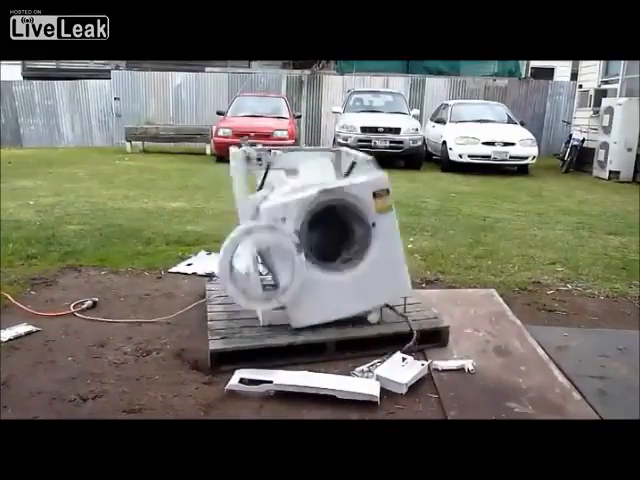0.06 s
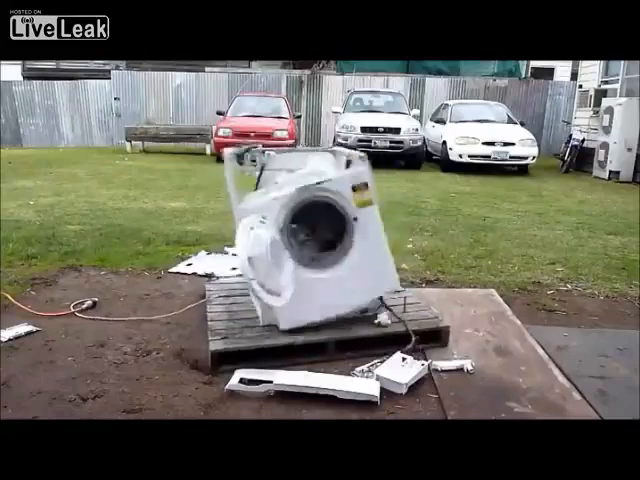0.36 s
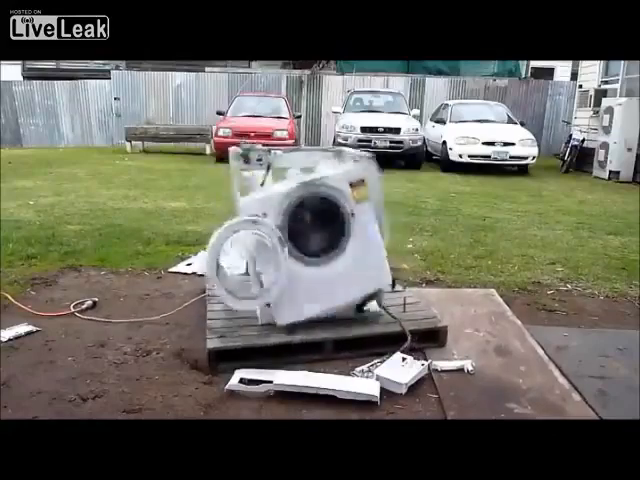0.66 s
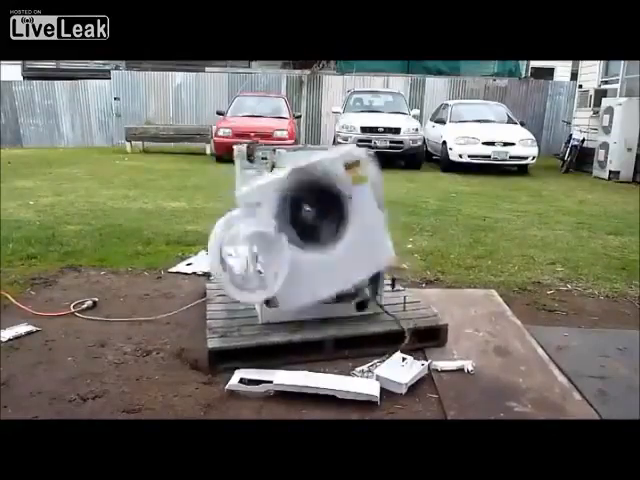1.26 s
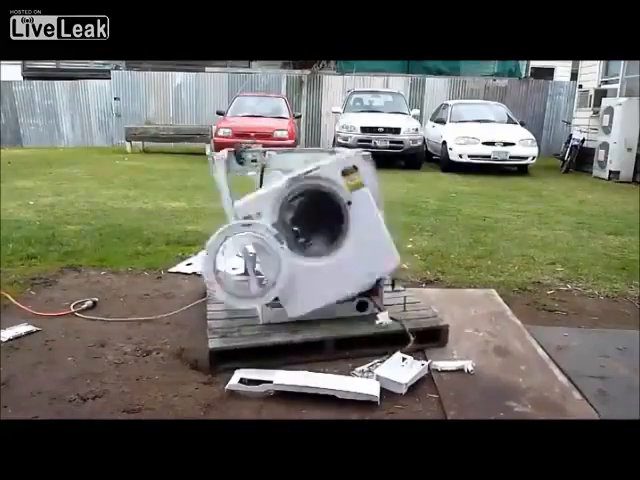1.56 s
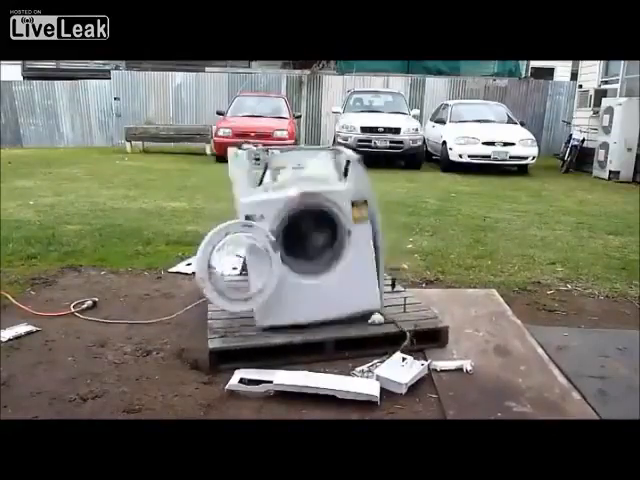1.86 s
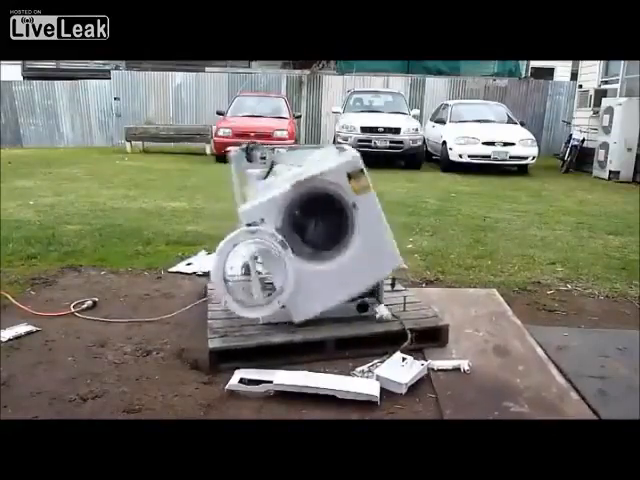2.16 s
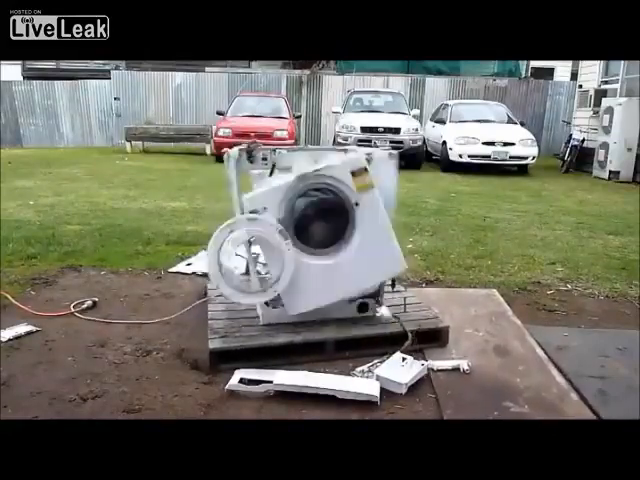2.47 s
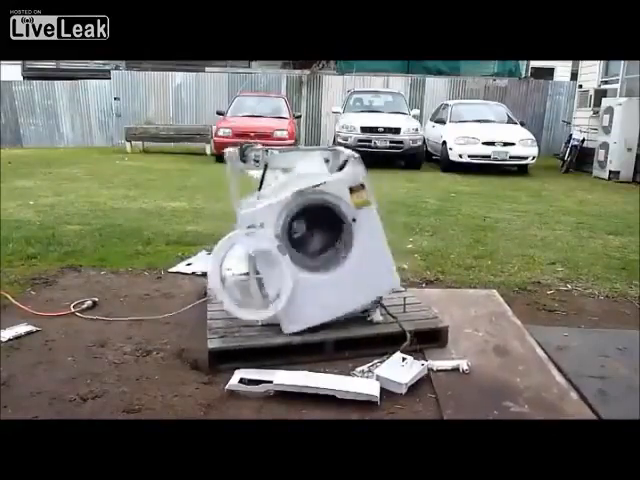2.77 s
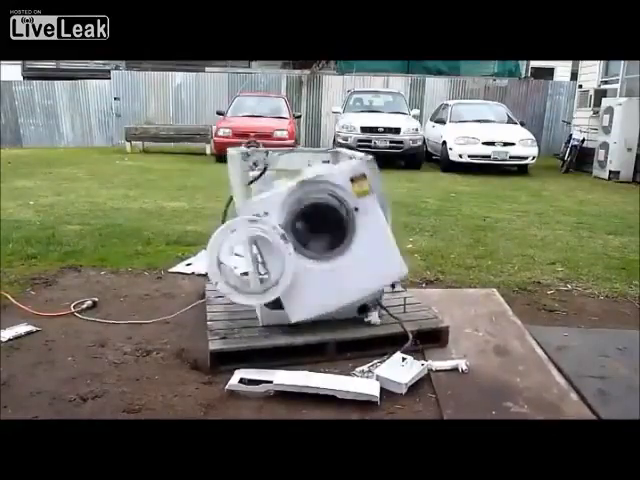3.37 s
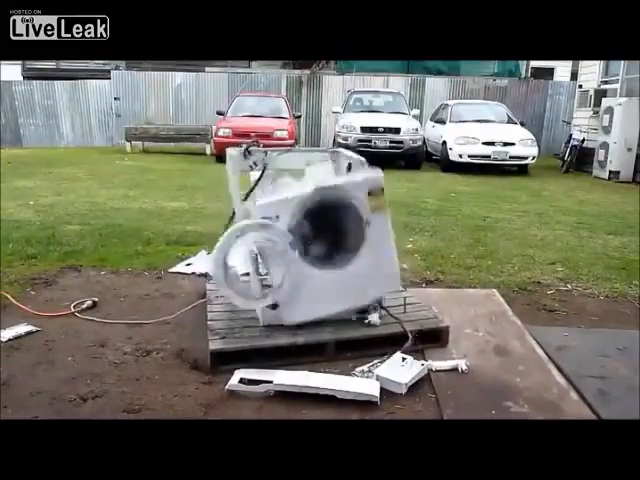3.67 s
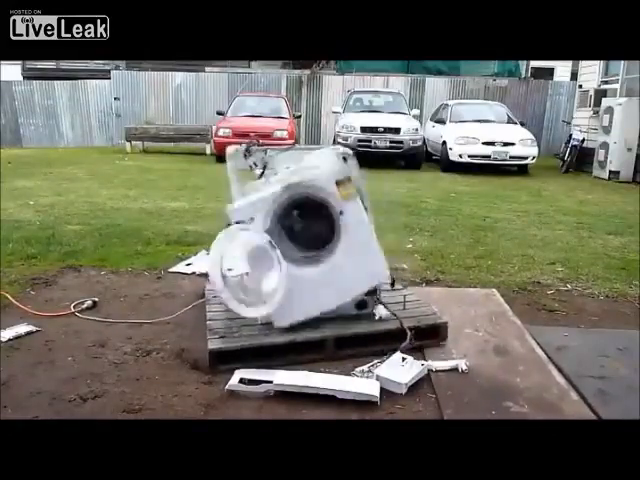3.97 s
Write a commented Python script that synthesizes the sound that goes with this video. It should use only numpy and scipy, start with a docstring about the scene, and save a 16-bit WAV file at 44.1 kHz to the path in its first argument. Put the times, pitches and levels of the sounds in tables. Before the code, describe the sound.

A broken washing machine bangs and clatters without pause in a fenced yard, a few metres from the microphone. Rapid, uneven sheet metal booms mix with bright rattling, scraping, hollow knocks and dull thuds on wooden boards.

```python
"""Sheet steel bangs and clatters: a wrecked washing machine spins off balance on a wooden pallet,
in a yard, some metres in front of the microphone. The tub slams into the cabinet several times
a turn and bottoms out on its springs with hollow knocks. Loose parts rattle and clash, the frame
thuds on the pallet, and the fence throws a little of the din back."""
import sys
import numpy as np
from scipy import signal
from scipy.fft import rfft, irfft
from scipy.io import wavfile

SR = 44100
rng = np.random.default_rng(int(sys.argv[2]) if len(sys.argv) > 2 else 0)


def unload_audio(sound):
    """Save the sound as a 16-bit wav file, at the path given as the first command line argument."""
    columns = np.transpose(np.atleast_2d(sound))
    # keep every value between -1 and 1, then stretch to whole-number steps
    steps = np.round(np.clip(columns, -1, 1) * 32767)
    wavfile.write(sys.argv[1], SR, steps.astype(np.int16))


N = 176400
TIME = np.arange(N) / SR


def amp(db):
    """Decibels to gain."""
    return 10 ** (np.asarray(db) / 20)


def curve_at(points, hz):
    """Interpolates a table on a log-frequency axis."""
    points_hz, values = np.transpose(points)
    return np.interp(np.log(hz + 1), np.log(points_hz + 1), values)


def through(x, response):
    """Convolves and keeps the scene's length."""
    return signal.fftconvolve(x, response)[:N]


def body(colour, modes=(), size=8192):
    """Minimum-phase response of unit energy: a broad colour with resonances on top."""
    hz = abs(np.fft.fftfreq(size, 1 / SR))
    peaks_db = sum(top / (1 + (2 * (hz - centre) / width) ** 2) for centre, width, top in modes)
    log_gain = np.log(amp(curve_at(colour, hz) + peaks_db))
    spectrum = np.exp(np.conj(signal.hilbert(log_gain)))
    response = np.fft.ifft(spectrum).real[:size // 2]
    return response / np.linalg.norm(response)


def ring(t60s, size=16384):
    """A dense tail of unit energy, each band dying in the time given for it."""
    hz, t, bands = signal.stft(rng.standard_normal(size), SR, nperseg=256)
    decay = np.exp(-np.log(1000) * t / curve_at(t60s, hz)[:, None])
    tail = signal.istft(bands * decay, SR)[1]
    return tail / np.linalg.norm(tail)


def contacts(per_s, spread_db):
    """Tiny random knocks of uneven size, rms 1."""
    sizes = amp(spread_db * np.minimum(rng.exponential(1, N), 4))
    knocks = sizes * rng.choice([-1, 1], N) * (rng.random(N) < per_s / SR)
    return knocks / np.sqrt(np.mean(knocks ** 2) + 1e-20)


def blow_power(rows, rise_s, hold_s):
    """Summed power of blows (start_s, level_db, fall_s) that rise, hold and die away."""
    power = np.zeros(N)
    for start_s, level_db, fall_s in rows:
        at = round(start_s * SR)
        t = TIME[:min(SR // 2, N - at)]
        envelope = np.minimum(t / rise_s, 1) * np.exp(-np.maximum(t - hold_s, 0) / fall_s)
        power[at:at + len(t)] += (amp(level_db) * envelope) ** 2
    return power


def struck(notes, rise_s, fall_s):
    """One mode swings up and rings out at each blow (start_s, level_db, pitch_hz)."""
    out = np.zeros(N)
    for start_s, level_db, pitch_hz in notes:
        at = round(start_s * SR)
        t = TIME[:min(SR // 4, N - at)]
        envelope = np.minimum(t / rise_s, 1) * np.exp(-np.maximum(t - rise_s, 0) / fall_s)
        tone = np.sin(2 * np.pi * (pitch_hz * t + rng.random()))
        out[at:at + len(t)] += amp(level_db) * envelope * tone
    return out


def jolts(per_s=45, fall_s=0.0052, share=0.39):
    """Random small jolts bunch a rattle into clacks: a power factor of mean 1."""
    kicks = rng.uniform(0.46, 1, N) * (rng.random(N) < per_s / SR)
    power = signal.lfilter([1], [1, -np.exp(-1 / (fall_s * SR))], kicks)
    return 1 - share + share * power / power.mean()


def loose_parts(power, colour, per_s, spread_db, count=4, ring_db=-4.5, t60_s=0.022):
    """Several metal parts chatter, each jolted on its own and with a short ring of its own."""
    out = np.zeros(N)
    for _ in range(count):
        knocks = np.sqrt(power * jolts()) * contacts(per_s / count, spread_db)
        out += knocks + amp(ring_db) * through(knocks, ring([(1, t60_s)]))
    return through(out, body(colour)) / np.sqrt(count * (1 + amp(ring_db) ** 2))


# How long the fenced yard rings: frequency_hz, t60_s
YARD_DECAY = [(500,0.2),(10000,0.5)]
def fence_reflections(direct):
    """The fence returns a faint, short tail to the microphone, longest in the treble."""
    return amp(-19.5) * through(direct, ring(YARD_DECAY))


# What reaches the microphone from the sides: frequency_hz, gain_db
SIDE_COLOUR = [(30,-12),(70,-25),(180,-25),(350,-25),(700,-17),(1400,-11.5),(2800,-8),(5600,-6.5),(9500,-4.5)]
def yard_scatter(din):
    """Sound scattered around the yard arrives from the sides and widens the treble."""
    gain = amp(curve_at(SIDE_COLOUR, np.fft.rfftfreq(N, 1 / SR)))
    return irfft(rfft(din) * gain, N)


# The dull tone of the wooden pallet: frequency_hz, relative_db
PALLET_COLOUR = [(15,-8),(35,2),(60,-5),(100,-3),(190,-3),(300,-4),(1000,-45)]
# The frame lands on the boards: start_s, relative_db, pitch_hz
PALLET_LANDINGS = [(0,4,105),(.145,2,102),(0.421,-4.5,95),(.54,2,83),(.84,-2,96),(1.06,-4,80),(1.421,2.5,99),(1.479,-1,96),(1.59,-15,98),(2.485,2,84.5),(2.669,1.5,80),(2.845,-1.5,99),(3.37,2,88),(3.565,-7,90),(3.611,0.5,101),(3.835,-2,100)]
def pallet_thuds(push_fall_s=0.014):
    """The boards take the weight of the frame: a dull push and a short low note."""
    landings = [(start_s, db, push_fall_s) for start_s, db, _ in PALLET_LANDINGS]
    power = blow_power(landings, rise_s=0.012, hold_s=0.016)
    push = through(np.sqrt(power) * rng.standard_normal(N), body(PALLET_COLOUR))
    boards = struck(PALLET_LANDINGS, rise_s=0.012, fall_s=0.02)
    return amp(-39) * push + amp(-28.5) * boards


# Knocks from inside the machine: start_s, relative_db, pitch_hz
TUB_KNOCKS = [(0,-2,189),(0.124,4.5,182),(0.281,3.5,179),(2.489,0,188),(2.63,-1.5,182.5),(2.786,4.5,196),(.34,-1,178),(.98,-2,195),(3.024,0.5,178),(3.032,-6,270),(3.181,4,192)]
def tub_knocks():
    """The tub bottoms out on its springs with a hollow knock."""
    return amp(-23) * struck(TUB_KNOCKS, rise_s=0.011, fall_s=0.021)


# The machine scrapes along the boards: start_s, length_s, relative_db
SCRAPES = [(0,0.038,-24.5),(.06,0.11,-31.5),(0.248,0.19,-27),(0.558,0.039,-25),(0.599,.16,-23),(0.766,0.063,-26),(0.852,0.12,-29),(0.993,0.11,-27),(1.109,0.1,-23.5),(1.297,0.039,-29),(1.379,0.088,-24),(1.57,0.049,-25.5),(1.662,0.05,-29),(1.76,0.14,-25.5),(1.852,0.14,-23.5),
           (2.034,0.078,-27.5),(2.15,0.088,-30),(2.282,0.041,-26.5),(2.378,0.173,-27),(2.565,0.223,-27),(2.796,0.058,-24.5),(2.907,0.193,-25),(3.11,0.18,-28),(3.296,0.089,-25.5),(3.397,0.15,-24),(3.542,0.17,-26),(3.773,0.27,-25)]
def scrape_power(fall_s=0.012):
    """Power of the shaking from each scrape: quick to start, a little slower to stop."""
    return sum(blow_power([(start_s, db, fall_s)], rise_s=0.0022, hold_s=length_s)
               for start_s, length_s, db in SCRAPES)


# The thin, bright tone of small parts: frequency_hz, relative_db
JINGLE_COLOUR = [(300,-46.5),(1500,1),(2600,-4.5),(4000,0),(6000,0),(8000,0),(10400,-3)]
def small_parts_rattle(scrape):
    """Small parts jingle all the time, and harder as the machine scrapes."""
    power = amp(-29.5) ** 2 + amp(-0.5) ** 2 * scrape
    return loose_parts(power, JINGLE_COLOUR, per_s=6000, spread_db=1.0)


# The hard tone of metal on metal: frequency_hz, relative_db
CLASH_COLOUR = [(300,-22),(1500,-7),(2800,4.5),(5000,3.5),(7500,-1.5),(10400,-1)]
# Loose parts collide: start_s, relative_db
COLLISIONS = [(.006,-7.5),(.247,-3.5),(.298,-6),(.324,2),(.344,-2.5),(.457,-3.5),(.608,-6),(.703,-7),(.722,-5),(.837,-3),(.847,-1.5),(1.11,-4),(1.15,-1.5),(1.276,2),(1.374,-6),(1.492,-12),(1.654,-7),
              (1.859,-2.5),(2.036,-11),(2.158,-9),(2.472,-3.5),(2.636,-5),(2.702,-5),(2.808,3.5),(3.047,-1),(3.337,3),(3.426,-2),(3.494,-4.5),(3.582,-1.5),(3.682,-3.5)]
def metal_clashes(fall_s=0.013):
    """Loose metal parts crash together in short, dense, bright bursts of contacts."""
    hits = [(start_s, db, fall_s) for start_s, db in COLLISIONS]
    power = blow_power(hits, rise_s=0.00039, hold_s=0.0067)
    bursts = np.sqrt(power) * contacts(per_s=8000, spread_db=2.6)
    return amp(-19) * through(bursts, body(CLASH_COLOUR))


# The midrange tone of the panel edges: frequency_hz, relative_db
EDGE_COLOUR = [(100,-28),(400,-2),(800,2.5),(1300,-0.8),(1850,-3.5),(2600,-4),(4000,-8.5),(6500,-14.5),(10500,-24.5)]
def edge_clatter(hits, scrape):
    """Panel edges grind together, harder during a scrape, and clatter at each blow."""
    grind = amp(-31.5) ** 2 + amp(-5.5) ** 2 * scrape
    clatter = amp(-1.5) ** 2 * blow_power(hits, rise_s=0.0008, hold_s=0.013)
    return loose_parts(grind + clatter, EDGE_COLOUR, per_s=4500, spread_db=0.5)


# The broad tone of the steel sheets, some metres off: frequency_hz, relative_db
PANEL_COLOUR = [(20,-35),(50,-23.5),(80,-17),(125,-15),(220,-8),(330,-4.5),(500,-3.5),(680,-9.5),(1000,-13.5),(1500,-20),(3000,-34.5),(10000,-45.5)]
# Resonances of the cabinet: pitch_hz, width_hz, boost_db
CABINET_MODES = [(96,19.6,7.5),(176.6,42,5),(261,6.2,2),(297,26,1.5),(334,39,1),(373,33,3),(569,31,4.5),(635,50,5),(740,50,4.5),(1128,34,7.5)]
def panel_boom(hits):
    """The cabinet's sheets roar steadily under the spinning tub and boom at each blow."""
    roar = amp(-25.5) ** 2
    booms = amp(-4) ** 2 * blow_power(hits, rise_s=0.0025, hold_s=0.0049)
    shaking = np.sqrt(roar + booms) * contacts(per_s=3000, spread_db=0.5)
    return through(shaking, body(PANEL_COLOUR, CABINET_MODES))


# The tub hits the cabinet: start_s, boom_relative_db, clatter_relative_db, fall_s, pitch_hz
TUB_SLAMS = [(0.002, -17.5, -25.5, 0.054, 334.6), (0.119, -18, -23.0, 0.056, 320.0),
             (0.166, -18.5, -24.5, 0.024, 347.0), (0.188, -21, -24.5, 0.074, 363.0),
             (0.281, -18.0, -34, 0.076, 546.0), (0.342, -15, -18.0, 0.023, 503.0),
             (0.388, -21.0, -20.5, 0.063, 418), (0.459, -17.0, -22.5, 0.056, 353.0),
             (0.594, -17.0, -21, 0.036, 385.0), (0.618, -20, -23.5, 0.048, 472),
             (0.662, -16.0, -25, 0.045, 397), (0.699, -18.5, -22, 0.026, 382.0),
             (0.722, -18.5, -28.0, 0.047, 364), (0.835, -14.5, -19.0, 0.047, 438),
             (0.859, -18, -21, 0.026, 425.0), (0.924, -20, -36.0, 0.059, 337),
             (0.978, -15.0, -22.5, 0.041, 342.4), (1.049, -17.5, -27.5, 0.075, 366.0),
             (1.106, -19.5, -28, 0.084, 450.0), (1.279, -15.5, -20, 0.043, 443),
             (1.328, -16.0, -35.0, 0.029, 350.4), (1.394, -16.5, -24.0, 0.029, 330.4),
             (1.424, -20.5, -23.5, 0.044, 482.0), (1.463, -17.5, -25.0, 0.038, 404),
             (1.494, -15.5, -21.5, 0.059, 331.7), (1.564, -17.0, -23.5, 0.032, 498.0),
             (1.628, -17.0, -27.0, 0.032, 334.0), (1.654, -17.5, -18.5, 0.038, 727.0),
             (1.726, -22.0, -22.5, 0.031, 371.0), (1.767, -15, -23.5, 0.032, 565),
             (1.798, -19, -20.5, 0.068, 335), (1.87, -18, -24, 0.032, 342.0),
             (1.916, -21.0, -19.5, 0.062, 344), (1.932, -13.5, -34, 0.035, 345.0),
             (2.036, -15.0, -23.5, 0.054, 331.0), (2.158, -17, -19.5, 0.029, 325),
             (2.208, -16.0, -23.5, 0.047, 371.0), (2.294, -17.5, -19.5, 0.029, 380.0),
             (2.309, -16.5, -24.5, 0.063, 382.0), (2.365, -18.5, -26, 0.062, 350.0),
             (2.411, -15.5, -24.5, 0.054, 361.0), (2.465, -16.5, -23.5, 0.056, 416),
             (2.521, -17.5, -24.5, 0.053, 436.0), (2.6, -18.0, -28, 0.077, 424),
             (2.632, -16.5, -26, 0.04, 377.0), (2.784, -18.0, -19.0, 0.028, 404.0),
             (2.824, -21, -19.5, 0.026, 383), (2.889, -16.0, -24.0, 0.055, 340),
             (2.934, -19.5, -19.5, 0.059, 467), (2.97, -19.5, -19.5, 0.059, 388.0),
             (3.023, -15.5, -22.0, 0.03, 293.7), (3.06, -22.5, -22.5, 0.033, 450.0),
             (3.13, -19.5, -28, 0.053, 362), (3.163, -17.0, -24, 0.074, 326.0),
             (3.287, -15.5, -22.5, 0.05, 325), (3.333, -21.5, -19.0, 0.053, 357),
             (3.4, -18.5, -25, 0.044, 360), (3.417, -17.0, -17.5, 0.057, 306),
             (3.471, -20, -23.5, 0.047, 440), (3.543, -17, -22.0, 0.074, 328.0),
             (3.626, -17.5, -22, 0.035, 421), (3.674, -24, -23.5, 0.065, 330),
             (3.804, -17.0, -30.0, 0.038, 340), (3.824, -21, -18, 0.059, 557.0),
             (3.882, -18, -26, 0.078, 349), (3.943, -20.5, -19.5, 0.041, 546.0),
             (3.962, -15.5, -22, 0.065, 347.0)]
def cabinet_bangs(scrape):
    """Each slam of the tub booms through the cabinet, rings one panel and clatters the edges."""
    booms = [(start_s, db, fall_s) for start_s, db, _, fall_s, _ in TUB_SLAMS]
    notes = [(start_s, db, pitch_hz) for start_s, db, _, _, pitch_hz in TUB_SLAMS]
    clatters = [(start_s, db, fall_s) for start_s, _, db, fall_s, _ in TUB_SLAMS]
    boom = panel_boom(booms)
    panel_ring = amp(-3.8) * struck(notes, rise_s=0.003, fall_s=0.033)
    return boom + panel_ring + edge_clatter(clatters, scrape)


def machine():
    """The whole din; the same scrapes shake the panel edges and the small parts."""
    scrape = scrape_power()
    metal = cabinet_bangs(scrape) + small_parts_rattle(scrape) + metal_clashes()
    return metal + pallet_thuds() + tub_knocks()


def scene(balance_db=0.25):
    """A mid-side microphone faces the machine across the yard; the left is a touch louder."""
    direct = machine()
    mid = direct + fence_reflections(direct)
    side = yard_scatter(machine())  # the same blows with an unrelated fine grain
    return np.array([(mid + side) * amp(balance_db), (mid - side) * amp(-balance_db)])


def record(dry, ceiling=0.62, cutoff_hz=10430):
    """The highest peaks are rounded off, then the top of the treble is cut."""
    rounded = dry / (1 + (dry / ceiling) ** 4) ** 0.25
    low_pass = signal.firwin(801, cutoff_hz, window=("kaiser", 9), fs=SR)
    return signal.oaconvolve(rounded, low_pass[None], "same")


dry = scene()
out = record(dry)
unload_audio(out)
```